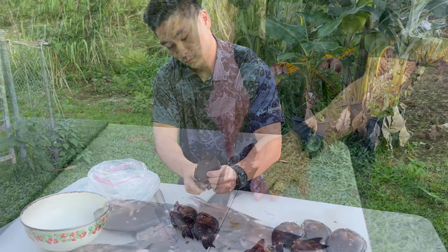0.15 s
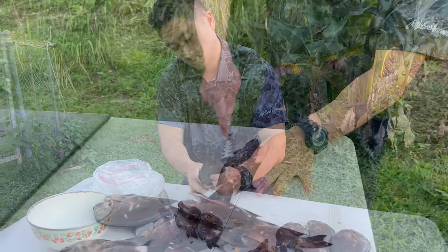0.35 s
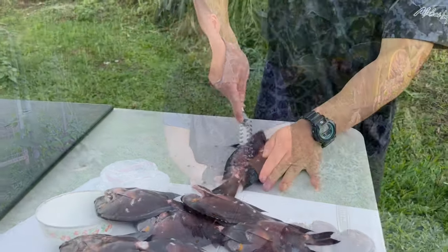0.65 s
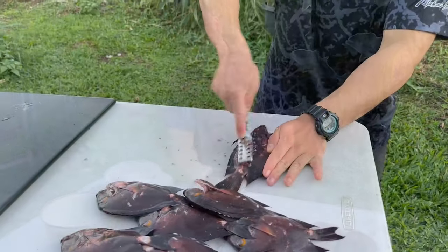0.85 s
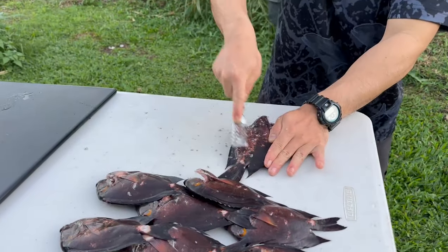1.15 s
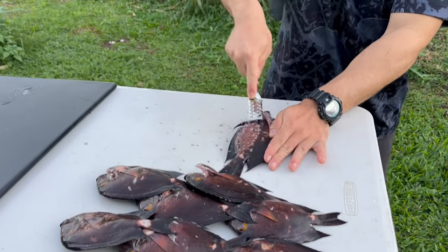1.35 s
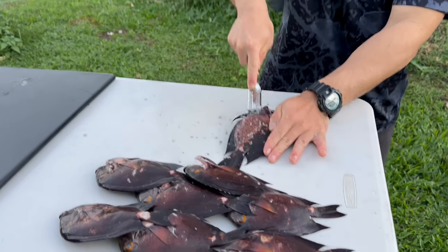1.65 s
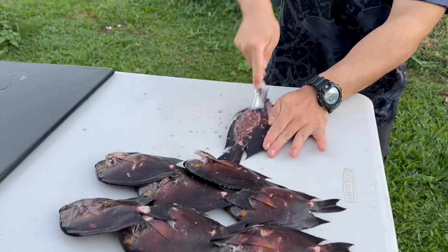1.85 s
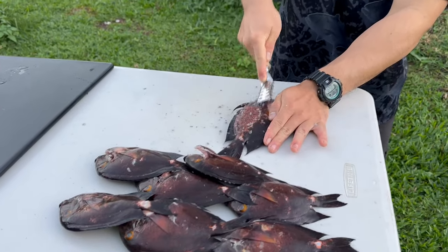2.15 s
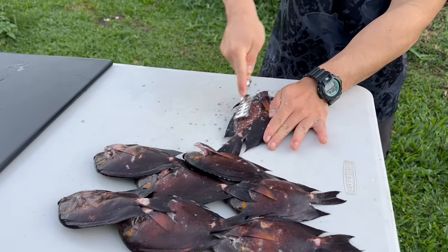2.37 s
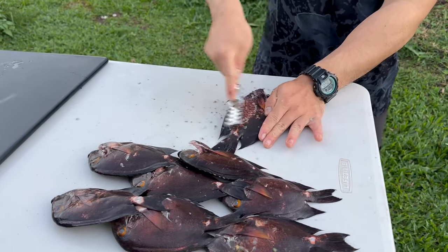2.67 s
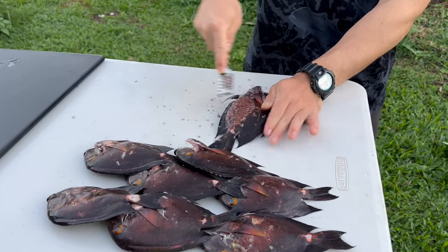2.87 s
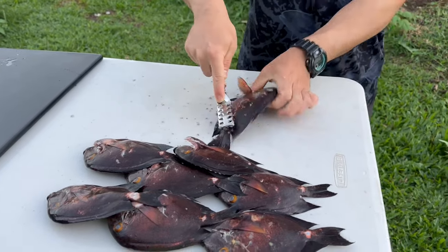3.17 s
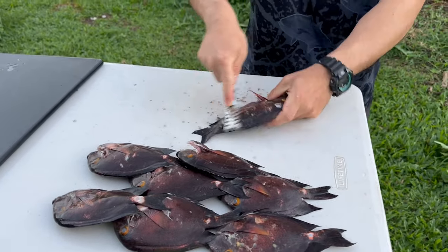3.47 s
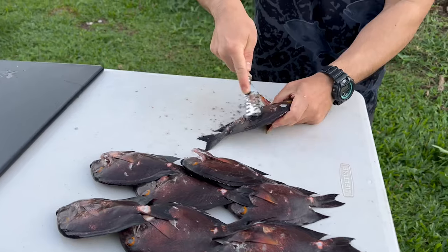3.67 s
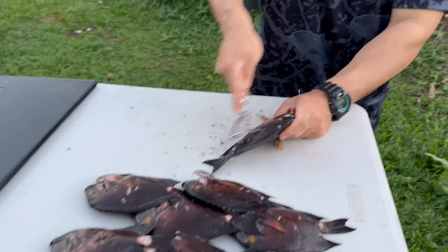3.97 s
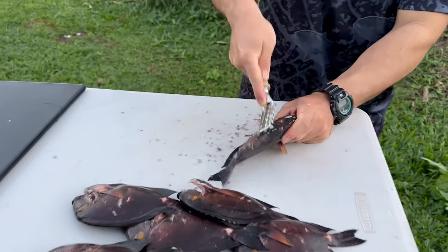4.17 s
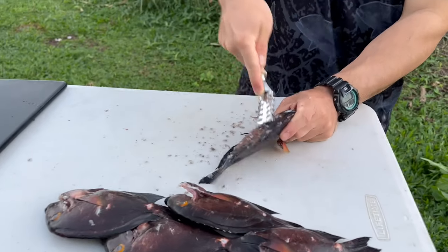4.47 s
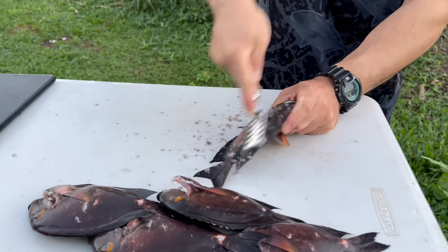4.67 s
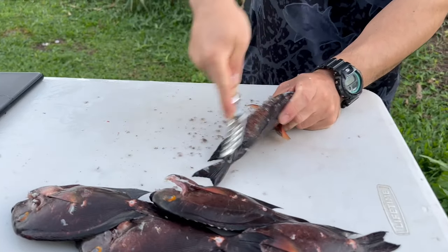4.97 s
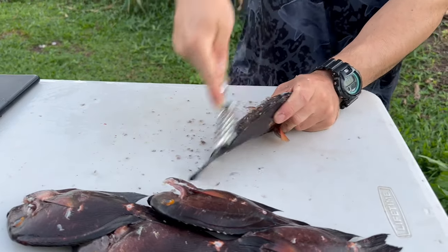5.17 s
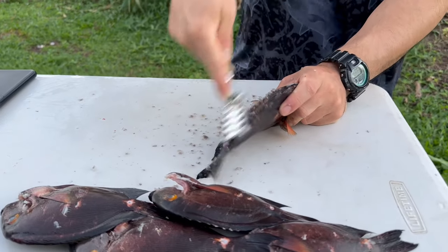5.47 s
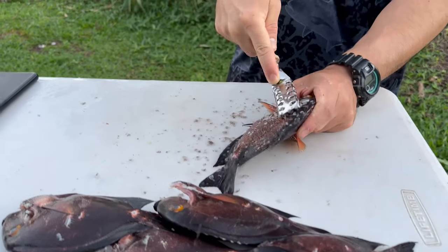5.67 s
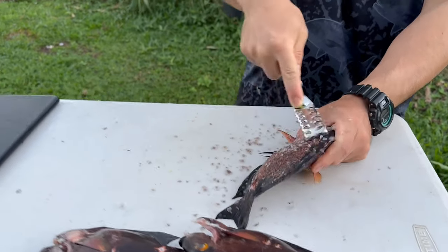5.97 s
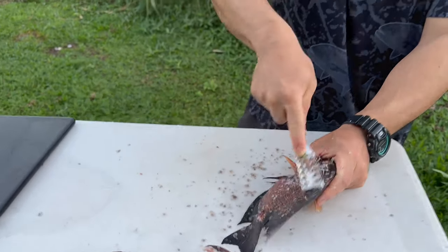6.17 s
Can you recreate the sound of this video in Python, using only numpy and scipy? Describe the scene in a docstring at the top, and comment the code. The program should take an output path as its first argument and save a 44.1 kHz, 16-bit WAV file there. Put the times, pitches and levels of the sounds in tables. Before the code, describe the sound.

Bright, crackling scrapes of metal teeth on fish scales come about three per second over a hollow tabletop, with faint bird whistles and a distant rooster.

```python
"""Outdoors, a toothed metal scaler is dragged in quick strokes over a fish on a hollow plastic table.
Scales snap off as blips amid a rasp of filtered noise and crackle; resonators give the thin ring of the tool.
Noise through the modes of table top and frame hums and thuds under the push; knocks ring the top.
Gliding breathy tones make squeaks of the tool, a small bird's whistle and a far rooster's crow."""
import sys
import numpy as np
from scipy import signal
from scipy.fft import rfft, irfft
from scipy.io import wavfile

SR = 44100
rng = np.random.default_rng(int(sys.argv[2]) if len(sys.argv) > 2 else 0)


def transcribe(u):
    """Save the signal u as a 16-bit wav file named by the first command-line argument.

    u: samples, shape (n,) or (channels, n), limited to [-1, 1]; the rate is SR.
    q: integer samples, one column per channel.
    """
    v = np.clip(np.atleast_2d(u).T, -1, 1)
    q = np.round(v * 32767).astype(np.int16)
    wavfile.write(sys.argv[1], SR, q)


def ratio_of_db(decibels):
    """Turn decibels (scalar or array-like) into linear amplitude factors; 0 dB maps to 1."""
    return 10 ** (np.asarray(decibels, float) / 20)


N = 279195

# modes of the table top: pitch_hz, width_hz, level_db
TOP_MODES = [(567, 67, -6.5), (762, 51, -0.5), (935, 180, -11.5), (1274, 127, -1), (1482, 120, -5.5),
             (1650, 82, -1), (1800, 20, -19.5)]


def evened(x):
    """Scales to rms 1."""
    return x / np.sqrt(np.mean(x ** 2) + 1e-20)


def coloured(x, points):
    """Filters by a (hz, relative db) spectrum, then scales to rms 1."""
    f, db = np.transpose(points)
    hz = np.fft.rfftfreq(len(x), 1 / SR)
    gain = ratio_of_db(np.interp(np.log(hz + 1), np.log(f + 1), db))
    return evened(irfft(rfft(x) * gain, len(x)))


def split(x, hz):
    """Complementary parts below and above hz, each of rms 1."""
    low = signal.sosfiltfilt(signal.butter(4, hz, fs=SR, output="sos"), x)
    return evened(low), evened(x - low)


def ringing(x, modes):
    """Sum of two-pole resonances (pitch_hz, width_hz, level_db) of alternating sign."""
    out = 0
    for k, (hz, width_hz, db) in enumerate(modes):
        r = np.exp(-np.pi * width_hz / SR)
        poles = [1, -2 * r * np.cos(2 * np.pi * hz / SR), r * r]
        out = out + (-1) ** k * ratio_of_db(db) * signal.lfilter([1 - r, 0, r - 1], poles, x)
    return out


def add(mix, s, sound):
    """Mixes a sound in at time s."""
    part = mix[max(round(s * SR), 0):][:len(sound)]
    part += sound[:len(part)]


def wander(hz, size):
    """Noise low-passed at hz, of about rms 1."""
    sos = signal.butter(2, hz, fs=SR, output="sos")
    return evened(signal.sosfilt(sos, rng.standard_normal(size + 4000))[4000:])  # filter onset cut off


def blip(hz, cycles, rise):
    """A few cycles with a quick rise and an exponential fall, peak 1."""
    u = np.arange(int(6 * cycles / hz * SR) + 8) / SR * hz / cycles  # time in decay constants
    shape = (1 - np.exp(-u / rise)) * np.exp(-u) * np.sin(2 * np.pi * cycles * u)
    return shape / abs(shape).max()


def envelope(rows, rise_s, swell_s, swell_db, sag_db_per_s, lift_s, lift_db, tail_db_per_s):
    """Contacts (start, length, dB) rise, swell, sag, drop at the lift and die away; their powers add."""
    power = np.full(N, 1e-12)
    for s, length_s, db in rows:
        swell = min(swell_s, length_s / 2)
        held_db = db + sag_db_per_s * length_s
        lifted_db = held_db + lift_db
        at_s = np.cumsum([0, rise_s, swell, length_s - swell, lift_s, .5])
        knots_db = [db - 40, db - swell_db, db, held_db, lifted_db, lifted_db + tail_db_per_s / 2]
        contact = ratio_of_db(2 * np.interp(np.arange(0, at_s[-1], 1 / SR), at_s, knots_db))
        before_start = max(round((rise_s - s) * SR), 0)  # the rise may begin ahead of time 0
        add(power, s - rise_s, contact[before_start:])
    return np.sqrt(power)


def layers(rows, shape, tails_db_per_s):
    """Envelopes of the lower and the upper modes of one table of pushes."""
    s, length_s, db, upper_db = np.transpose(rows)
    lower = envelope(zip(s, length_s, db), *shape, tails_db_per_s[0])
    upper = envelope(zip(s, length_s, db + upper_db), *shape, tails_db_per_s[1])
    return lower, upper


def air():
    """A faint steady floor of coloured noise."""
    # spectrum: hz, relative_db
    spectrum = [(18, -33.5), (30, -12), (120, -8), (1720, -16.5), (2980, -17.5), (3400, -36), (4190, -19),
                (4780, -17), (16000, -22)]
    return ratio_of_db(-72) * coloured(rng.standard_normal(N), spectrum)


def crackle(per_s, spread_db):
    """Small scales at random times, each a blip of one of 16 pitches and of random size; rms 1."""
    out = np.zeros(N)
    for hz in np.geomspace(2800, 15500, num=16):
        size = ratio_of_db(spread_db * np.minimum(rng.exponential(1, N), 4)) * rng.choice([-1, 1], N)
        hits = size * (rng.random(N) < per_s / 16 / SR)
        grain = blip(hz, 1.87, 0.94)
        out += signal.oaconvolve(hits, grain / np.linalg.norm(grain) * np.sqrt(hz))[:N]
    return evened(out)


def scraping():
    """Teeth on scales: crackle while pressed hard, smooth hiss as it dies; the tool rings along."""
    # teeth bite into the scales: start_s, length_s, rasp_db,
    # middle treble and low treble against the rasp: middle_db, low_db
    strokes = [(0, 0.1, -65, -2, -1.5), (.106, .022, -56, 0, 15), (.128, 0.016, -56.5, 1, 20),
               (.19, 0.087, -66, -2, 11), (2.32, 0.01, -66, -6, -8), (.903, .012, -51.5, -20.5, -28.5),
               (1.24, .008, -47.5, -22, -30), (1.563, .011, -44, -28, -34.5), (1.874, .012, -40, -20, -45),
               (2.02, 0.0076, -59, 1, 3.5), (2.152, .028, -45, -7.5, -9), (2.45, .016, -40, -15.5, -30),
               (2.75, .018, -55, -10.5, -7), (2.865, 0.01, -39, -3.5, 2), (4.384, .012, -34.5, -14, -27),
               (4.688, 0.013, -33, -30, -45), (5.006, .016, -38, -22, -34.5), (5.3, .011, -43.5, -18, -20),
               (5.603, .009, -39.5, -17, -25), (5.914, .012, -35, -12, -35), (6.2, .016, -50, -2, -2),
               (3.25, 0.078, -44, 0, 1.5), (3.118, .035, -51, -8, 6), (3.38, .065, -51, -5, 3),
               (3.485, .055, -48, 3, 4), (3.77, .06, -46, -11, -6), (3.93, .04, -40, -9, -11),
               (5.36, .05, -42, -6, -9), (.282, .012, -35, 6, 1.5), (.294, .028, -44, 0, 9),
               (0.324, 0.0091, -37, -31, -31.5), (.497, 0.051, -42.5, 3, 0.5), (.55, .06, -34, -12, -10),
               (.615, .073, -30, -8, -14), (.755, 0.01, -41, -4, -11.5), (.91, .028, -41, -15.5, -42),
               (.94, 0.081, -30, -8, -18), (1.248, 0.033, -30.5, -12, -23), (1.29, .045, -33, -1, -8),
               (1.575, 0.1, -28.5, -9.5, -31.5), (1.885, 0.016, -30.5, -10, -25),
               (1.914, 0.0081, -34, -2, -2.5), (2.178, 0.014, -31, -8.5, -6.5),
               (2.207, 0.019, -32.5, -6, -6.5), (2.466, .045, -31, -16, -33), (2.515, .021, -31, -3, -10),
               (2.768, .035, -36.5, -11, -13), (2.812, 0.031, -28, -10.5, -12.5),
               (3.06, .02, -47, -1.5, 12), (3.08, .035, -42, -3, 5), (3.154, 0.085, -42, -2.5, 3),
               (3.343, 0.018, -36.5, -6.5, 0.5), (3.448, 0.04, -39.5, -1, 0.5),
               (3.543, 0.048, -26, -11.5, -18), (3.631, 0.086, -45.5, -10.5, -15.5),
               (3.715, 0.057, -39.5, -3.5, -8), (3.833, .02, -38, -9, -1),
               (3.86, 0.067, -28.5, -9.5, -12.5), (4.077, 0.025, -48.5, 9, -5),
               (4.119, 0.068, -27.5, -7, -17.5), (4.198, .015, -27, -7, -15), (4.397, 0.053, -25, -9, -21),
               (4.46, 0.075, -29, -10, -16), (4.702, .07, -25.5, -12.5, -24),
               (4.781, 0.057, -37.5, -18, -14), (5.023, 0.074, -27, -11, -12.5),
               (5.311, 0.049, -28.5, -8.5, -13.5), (5.43, .011, -34.5, -3.5, -15.5),
               (5.612, 0.11, -26.5, -12, -12.5), (5.925, .021, -26, -8.5, -35), (5.946, .045, -26, -9, -15),
               (6.216, .12, -32, -1, -7.5)]
    # spectrum of the rasp: hz, relative_db
    rasp = [(1120, -46.5), (1900, -22), (2020, -24), (2620, -22), (3160, -14.5), (4430, -14), (5790, -8),
            (6800, -7), (10600, 2), (14200, 1.5), (16000, -6.5)]
    # modes of the tool: pitch_hz, width_hz, level_db
    tool_modes = [(8055, 64, -2), (14400, 62, 3.5), (10300, 55, -5.5), (12800, 78, -12), (6300, 37, -13.5)]
    # the grip sets how much the tool rings and how much flesh it rubs:
    # from_s, ring_db against the rasp, rub_db against the low treble
    grip_rows = [(0, -26, -25), (.27, -26, -5), (.33, -25, -30), (.49, -26.5, -11), (1.55, -26, -30),
                 (1.86, -20, -6.5), (2.14, -8, -6.5), (2.44, -22, -17), (2.75, -6, -9), (3.05, -25, -4.5),
                 (3.33, -8, -3.5), (3.63, 4, 1.5), (3.83, -24, -6.5), (4.06, -29, -30), (4.67, -7, -21),
                 (4.99, -14, -15), (5.29, -3.5, -8.5), (5.9, -18, -10)]
    # dying away in high, middle, low treble: db_per_s
    tails_db_per_s = [-230, -215, -200]
    late_s_per_db = .0008  # tips touch first: the weaker a lower band, the later it joins
    bite_s, swell_s, swell_db = .007, .008, 4  # sharp start, then a swell by the last dB
    sag_db_per_s, lift_s, lift_db = -30.5, 0.015, -8.5
    pops_per_s, pops_db = 220, -13  # lesser scales pop off at random under pressure

    s, length_s, db, middle_db, low_db = np.transpose(strokes)

    def band(under_db, tail):
        late = np.clip(-under_db * late_s_per_db, 0, 0.63 * length_s)
        rows = zip(s + late, length_s - late, db + under_db)
        return envelope(rows, bite_s, swell_s, swell_db, sag_db_per_s, lift_s, lift_db, tail)

    highs = band(0 * db, tails_db_per_s[0])
    middles = band(middle_db, tails_db_per_s[1])
    lows = band(low_db, tails_db_per_s[2])
    grip = np.transpose(grip_rows)
    ring_db, rub_db = grip[1:, np.searchsorted(grip[0, 1:], np.arange(N) / SR)]

    pressed = np.clip((20 * np.log10(np.maximum(highs, lows)) + 48) / 12, 0, 1)
    flutter = ratio_of_db(2.6 * pressed * wander(95, N))  # teeth catch and slip
    crisp = 0.48 * pressed  # share of crackle
    hiss = np.sqrt(1 - crisp ** 2) * rng.standard_normal(N)
    drive = flutter * (hiss + crisp * crackle(3000, 3.6))
    drive = drive + pressed * ratio_of_db(pops_db) * crackle(pops_per_s, 2.3)

    lower, high = split(coloured(drive, rasp), 7800)
    low, middle = split(lower, 4800)
    rub, low = split(low, 2850)
    ring = pressed * ratio_of_db(ring_db) * evened(ringing(drive, tool_modes))
    return highs * (high + ring) + middles * middle + lows * (low + ratio_of_db(rub_db) * rub)


def thud():
    """The table frame takes the push: noise through its modes thuds."""
    # pushes: start_s, length_s, thud_db, upper_db (upper modes against the thud)
    pushes = [(0, 0.033, -48.5, -18), (.11, 0.066, -50, -20), (0.222, 0.043, -62, -12),
              (0.325, 0.034, -48.5, -2), (0.453, .04, -52, -25), (.495, .03, -42, -11),
              (0.585, .04, -42, 0.5), (.65, .06, -49, 3), (0.733, 0.013, -45, -6.5),
              (0.92, 0.093, -45, 1.5), (1.259, .09, -51.5, 3.5), (1.581, 0.051, -49.5, 0),
              (1.922, 0.02, -49.5, 4.5), (1.98, .06, -66, 12), (2.206, 0.031, -44.5, 1.5),
              (2.3, .07, -75, 15), (2.425, 0.092, -59.5, -25), (2.52, 0.0098, -46.5, 4),
              (2.765, 0.056, -47.5, -2), (2.86, 0.019, -61, 7), (3.068, 0.02, -38, -8),
              (3.163, 0.2, -55.5, 2), (3.378, 0.012, -34, -16), (3.465, .03, -20, -10.5),
              (3.515, 0.045, -32.5, -6.5), (3.655, .03, -30, -12), (3.69, .1, -22, -14),
              (3.888, 0.088, -43, -10.5), (4.097, 0.055, -31, -16), (4.16, .09, -40, -14),
              (4.28, .08, -47, -24), (4.417, 0.027, -35, -2), (4.538, 0.011, -34, -15),
              (4.638, .015, -39, -37.5), (4.761, 0.043, -43.5, 0), (4.964, 0.042, -61.5, 8.5),
              (5.038, 0.043, -35, -8), (5.11, 0.016, -47.5, 2.5), (5.324, .05, -44, 0.5),
              (5.43, .03, -43, 0), (5.62, .06, -37, -0.5), (5.79, 0.025, -62, -14),
              (5.934, 0.065, -55.5, 2.5), (6.131, .12, -44, -27)]
    # modes of the frame: pitch_hz, width_hz, level_db
    frame_modes = [(78, 27.5, -3.5), (99.3, 17.1, 2.5), (141.6, 20.6, -0.5), (204, 11, -9),
                   (257.6, 33, -13.5), (346.5, 2.2, -19)]
    # envelope: rise_s, swell_s, swell_db, sag_db_per_s, lift_s, lift_db
    shape = (0.0227, 0.1, 4.5, -30, 0.03, -5)
    # dying away of lower, upper modes: db_per_s
    tails_db_per_s = [-480, -300]
    frame = ringing(rng.standard_normal(N), frame_modes)
    lower, upper = split(ringing(frame, [(150, 250, 0)]), 185)
    lower_level, upper_level = layers(pushes, shape, tails_db_per_s)
    return lower_level * lower + upper_level * upper


def hum():
    """The fish presses on the hollow table top, whose modes hum under the jolts of the teeth."""
    # presses: start_s, length_s, hum_db, upper_db (upper modes against the hum)
    presses = [(0.04, 0.42, -63, -4.5), (0.29, .06, -48.5, -18), (0.505, 0.031, -50, 5),
               (.56, 0.055, -24.5, -8), (.62, .07, -38, -10), (.76, .025, -54, -6), (.92, .03, -54, -21),
               (0.945, 0.093, -39, -8), (1.255, 0.093, -38, -7.5), (1.582, 0.088, -39.5, -5),
               (1.896, 0.022, -35.5, -8), (2.181, 0.027, -35.5, -3), (2.473, .021, -45, -15),
               (2.506, 0.0054, -36.5, -2), (2.776, .012, -35.5, -25), (2.793, .014, -27.5, 0),
               (3.074, .055, -32, 3), (3.156, 0.38, -35.5, -4), (3.446, 0.097, -40.5, -1),
               (3.54, 0.0088, -31.5, -10.5), (3.634, 0.11, -55, -2), (3.745, 0.026, -40, 3.5),
               (3.875, 0.0054, -30.5, -8.5), (4.077, .085, -39, -3.5), (4.201, 0.01, -47, -26),
               (4.391, 0.041, -36.5, -6.5), (4.486, 0.016, -35, -18), (4.719, 0.068, -35, -15),
               (5.021, 0.037, -56.5, 13.5), (5.042, 0.079, -35, -10), (5.207, 0.011, -46, -25),
               (5.316, 0.027, -36.5, -4), (5.37, .03, -46, -8), (5.427, 0.0075, -43, -26),
               (5.612, 0.052, -27.5, -6), (5.945, 0.034, -48, 8), (6.251, .08, -42.5, 0)]
    # envelope: rise_s, swell_s, swell_db, sag_db_per_s, lift_s, lift_db
    shape = (0.02, 0.56, 5, -59, 0.03, -5.5)
    # dying away of lower, upper modes: db_per_s
    tails_db_per_s = [-210, -260]
    bumps = (rng.random(N) < 300 / SR) * rng.standard_normal(N)  # single teeth jolt the table
    push = ratio_of_db(2.2 * wander(40, N)) * (rng.standard_normal(N) + .7 * evened(bumps))
    sos = signal.butter(8, [440, 1880], "band", fs=SR, output="sos")
    top = signal.sosfilt(sos, ringing(push, TOP_MODES) + 0.24 * push)
    lower, upper = split(top, 1100)
    lower_level, upper_level = layers(presses, shape, tails_db_per_s)
    return lower_level * lower + upper_level * upper


def snaps():
    """Each loud scale is a short blip plus a weaker, mostly lower tick; too small to sound low."""
    # scales that snap off loudly: start_s, level_db (snap and rasp together), pitch_hz
    loud_scales = [(0.1062, -25, 4190), (0.1295, -19.5, 3440), (0.1346, -26, 3270), (0.2824, -12, 5540),
                   (0.2865, -15, 4230), (0.4983, -31, 3320), (0.5804, -20, 12600), (0.599, -19, 11600),
                   (0.6274, -17, 10560), (0.6434, -9, 12500), (0.6493, -11, 12400), (0.6874, -13, 11600),
                   (0.9358, -13.5, 14400), (0.9512, -12, 10600), (0.9752, -11, 15100),
                   (0.9896, -9.5, 10900), (1.0187, -13, 9300), (1.25, -18, 11550), (1.2554, -15.5, 9150),
                   (1.264, -14, 14500), (1.296, -15, 9870), (1.3233, -8.5, 9310), (1.3347, -10, 14900),
                   (1.5776, -14.5, 10500), (1.5945, -14.5, 9500), (1.6044, -15, 14500), (1.6197, -13, 9620),
                   (1.6744, -14, 14400), (1.8901, -12, 14700), (1.8974, -11, 15000), (1.9194, -11, 4520),
                   (2.189, -15, 7100), (2.214, -11, 9280), (2.4813, -16, 11400), (2.495, -11, 10000),
                   (2.5277, -7, 14200), (2.812, -10, 15000), (2.831, -12.5, 7150), (2.868, -19.5, 3920),
                   (2.8714, -16, 13900), (3.0614, -5, 3270), (3.0646, -12.5, 3250), (3.1592, -17, 3370),
                   (3.1664, -17, 3260), (3.247, -20.5, 3680), (3.3488, -21, 3400), (3.4501, -19, 3240),
                   (3.5446, -12, 9030), (3.5524, -11, 11240), (3.5687, -10, 15100), (3.5972, -10.5, 11000),
                   (3.6656, -26.5, 9480), (3.8388, -15.5, 4760), (3.8595, -8, 14200), (3.9004, -14, 13800),
                   (4.1233, -8.5, 13900), (4.1424, -9, 11600), (4.162, -15.5, 11500), (4.2025, -8, 11500),
                   (4.3955, -13, 11400), (4.4135, -9.5, 12000), (4.4443, -14, 11100), (4.4904, -16, 11800),
                   (4.5234, -15, 13000), (4.7117, -16, 13800), (4.7613, -13.5, 8100), (4.7744, -14, 11900),
                   (5.0285, -18, 13900), (5.067, -10, 11800), (5.0954, -13, 13900), (5.3132, -12, 13900),
                   (5.3414, -15, 11400), (5.4326, -18, 11500), (5.616, -8.5, 13900), (5.6496, -11, 13900),
                   (5.6694, -16, 11100), (5.686, -16, 11500), (5.7084, -7, 11900), (5.9467, -10.5, 9400),
                   (5.9804, -9, 12200), (6.2506, -8.5, 14000), (6.2763, -7, 6500)]
    out = np.zeros(N)
    for (s, db, hz), (sign, below) in zip(loud_scales, rng.random((len(loud_scales), 2))):
        ring = np.sign(sign - .5) * blip(hz, 1.6 + hz / 4500, 0.46)
        tick = blip(max(hz * (.55 + .3 * below), 3300), 2.2, .6)
        add(out, s + .0005, ratio_of_db(db - 2.5) * ring)  # the rasp fills the rest of the peak
        add(out, s + .0005, ratio_of_db(db - 10) * tick)
    return signal.sosfilt(signal.butter(6, 2900, "high", fs=SR, output="sos"), out)


def knocks():
    """Each knock is a push at its own pitch that leaves the table top ringing."""
    # the tool or the fish knocks on the table: start_s, push_peak_db, pitch_hz
    hits = [(0.563, -15, 700), (0.582, -7.5, 773), (1.033, -26.5, 1020), (1.908, -21.5, 1110),
            (1.928, -18, 936), (2.19, -17.5, 1005), (2.216, -12.5, 1330), (2.226, -19.5, 935),
            (2.517, -21.5, 1400), (2.79, -16.5, 724), (2.804, -13.5, 780), (2.869, -24, 900),
            (3.066, -17, 895), (3.098, -14, 840), (3.106, -6, 1250), (3.117, -22, 544), (3.147, -10, 1120),
            (3.248, -24.5, 1510), (3.452, -24, 1070), (3.546, -22, 570), (3.746, -25, 1110),
            (3.884, -18.5, 710), (3.893, -19.5, 685), (4.075, -33, 760), (4.105, -24.5, 1750),
            (4.406, -24.5, 584), (4.49, -27, 536), (4.739, -23.5, 592), (4.792, -21.5, 588),
            (5.332, -24, 748), (5.609, -12, 843), (5.697, -23, 670), (6.242, -26.5, 1650)]
    push = np.zeros(N)
    for s, db, hz in hits:
        add(push, s, ratio_of_db(db) * blip(hz, 2.5, .15))
    return push + 0.56 * ringing(push, TOP_MODES)


def whistle(row, partials_db, arch, fuzz_hz, clean, echo_db):
    """A breathy gliding tone stack, blurred by a short diffuse echo; arch bulges the pitch in mid-note."""
    s, length_s, first_hz, last_hz, db = row
    u = np.arange(0, length_s, 1 / SR) / length_s
    bow = np.sin(np.pi * u)
    turns = np.cumsum((first_hz + (last_hz - first_hz) * u) * (1 + arch * bow)) / SR
    tone = 0
    for k, partial_db in enumerate(partials_db):
        # wobbling level and phase widen the line
        breath = clean + wander(fuzz_hz, len(u)) + 1j * wander(fuzz_hz, len(u))
        partial = (breath * np.exp(2j * np.pi * (k + 1) * turns)).real
        tone = tone + ratio_of_db(partial_db) * partial / np.sqrt(1 + clean ** 2 / 2)
    ends_db = -8.5  # every note swells and fades
    tone *= ratio_of_db(db + ends_db * (1 - bow)) * signal.windows.tukey(len(u), .15)
    taps = rng.standard_normal(4000) * ratio_of_db(-60 * np.arange(4000) / SR / 0.2)
    echo = signal.fftconvolve(tone, taps / np.linalg.norm(taps))
    return s, np.r_[tone, np.zeros(3999)] + ratio_of_db(echo_db) * echo


def squeaks():
    """The tool squeaks along the skin: single gliding tones with wide fuzz."""
    # squeaks: start_s, length_s, first_hz, last_hz, level_db
    rows = [(1.027, .07, 2040, 3450, -58), (1.035, .05, 4350, 6500, -53), (3.149, .055, 3620, 2960, -32),
            (4.549, 0.1, 11700, 11000, -50.5), (6.266, 0.068, 5900, 5340, -25.5),
            (6.267, 0.063, 7830, 7480, -29), (6.259, .07, 1125, 1247, -32.5)]
    out = np.zeros(N)
    for row in rows:
        add(out, *whistle(row, [0], arch=0, fuzz_hz=200, clean=.6, echo_db=-16))
    return out


def bird():
    """A small bird whistles single arched tones."""
    # notes: start_s, length_s, first_hz, last_hz, level_db
    notes = [(2.125, 0.12, 3870, 3380, -57.5), (2.332, 0.18, 3570, 3550, -59),
             (2.596, 0.2, 3895, 3585, -57), (2.62, .14, 4950, 4600, -66.5), (2.871, .18, 3700, 3420, -50),
             (3.198, .16, 3780, 3400, -44), (3.454, 0.13, 3380, 3420, -39.5), (3.642, .11, 3400, 3360, -60),
             (6.122, 0.11, 4100, 4070, -60)]
    out = np.zeros(N)
    for row in notes:
        add(out, *whistle(row, [0], arch=.025, fuzz_hz=100, clean=.8, echo_db=-3))
    return out


def rooster():
    """A far rooster crows in syllables of four sinking partials."""
    # syllables: start_s, length_s, pitch_hz, level_db, upper_db (raises partials 3 and 4, lowers 1)
    syllables = [(5.22, 0.092, 850, -61.5, -3), (5.475, .13, 900, -48, -12), (5.723, .12, 862, -47.5, 6.5),
                 (5.829, .11, 853, -52, 2.5), (5.938, 0.154, 860, -54, 1), (6.18, .14, 837, -54, -1)]
    sag = 0.0152  # share by which the pitch sinks
    out = np.zeros(N)
    for s, length_s, hz, db, upper_db in syllables:
        partials_db = np.array([-12.5, 0, -22, -12.5]) + upper_db * np.array([-1, 0, 1, 1])
        row = (s, length_s, hz, hz * (1 - sag), db)
        add(out, *whistle(row, partials_db, arch=.012, fuzz_hz=55, clean=.8, echo_db=-6))
    return out


def scene():
    """All sources over a faint floor of air, as one channel."""
    work = scraping() + thud() + hum() + snaps() + knocks() + squeaks()
    return (air() + work + bird() + rooster())[None]


def top_cut(x):
    """Nothing passes above the cut-off."""
    return signal.sosfilt(signal.butter(12, 16820, fs=SR, output="sos"), x)


def record(dry):
    """Bass cut, soft overload of the peaks, band limit."""
    cut = signal.sosfilt(signal.butter(2, 55, "high", fs=SR, output="sos"), dry)
    soft = .37 * np.tanh(cut / .37)
    edge = signal.firwin(255, 15900, window=("kaiser", 6), fs=SR)[None]
    mix = signal.oaconvolve(soft, edge, "same")
    return top_cut(mix)


dry = scene()
out = record(dry)
transcribe(out)
```